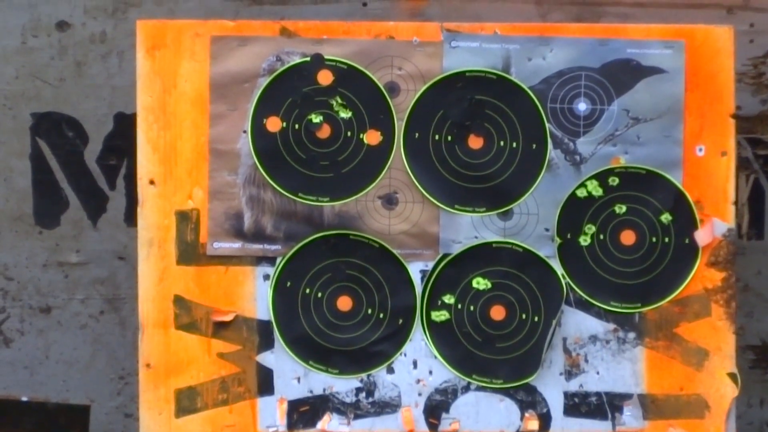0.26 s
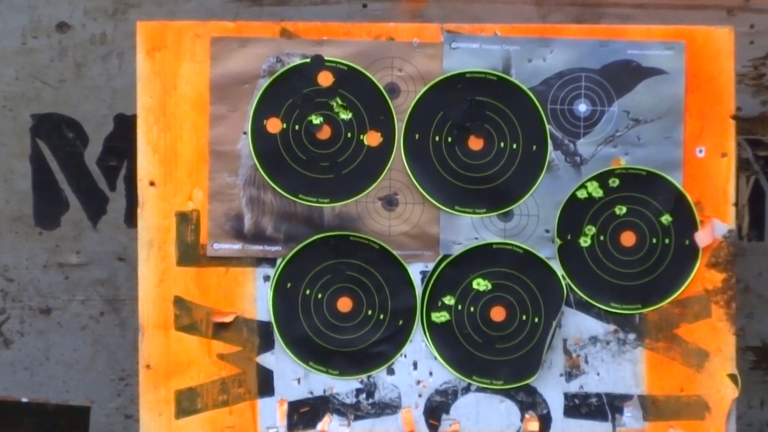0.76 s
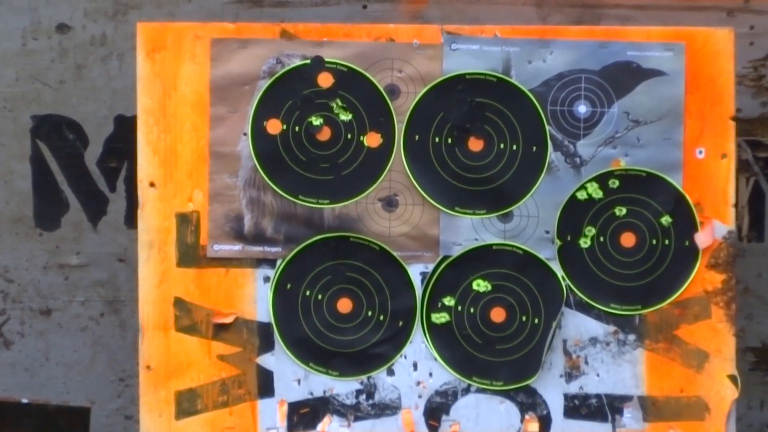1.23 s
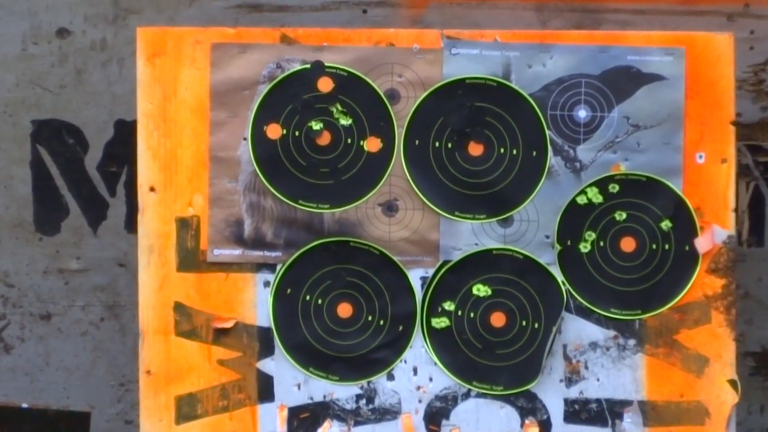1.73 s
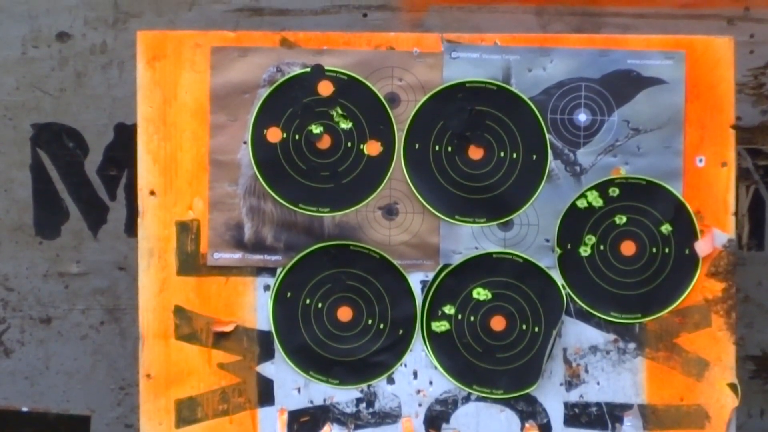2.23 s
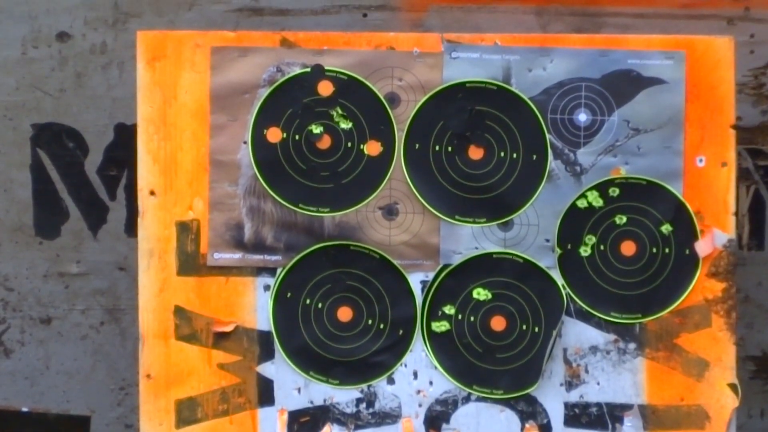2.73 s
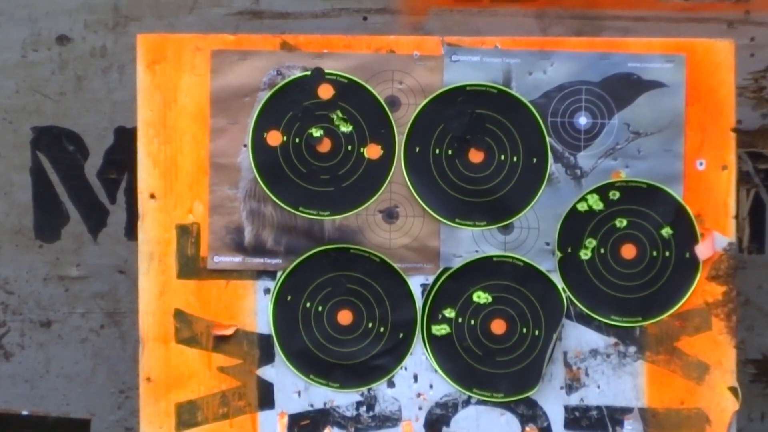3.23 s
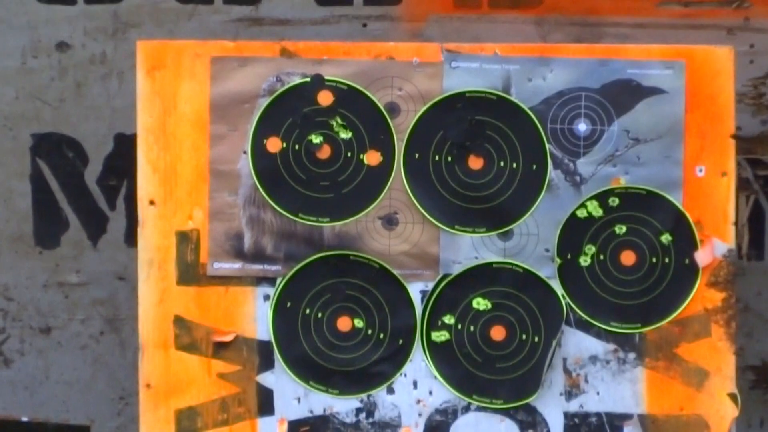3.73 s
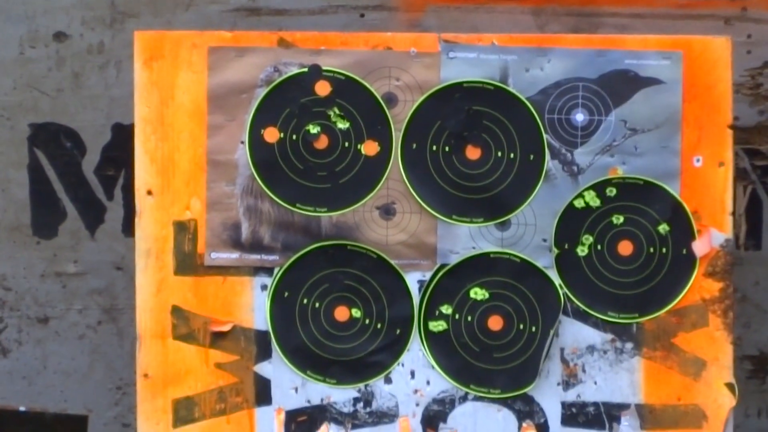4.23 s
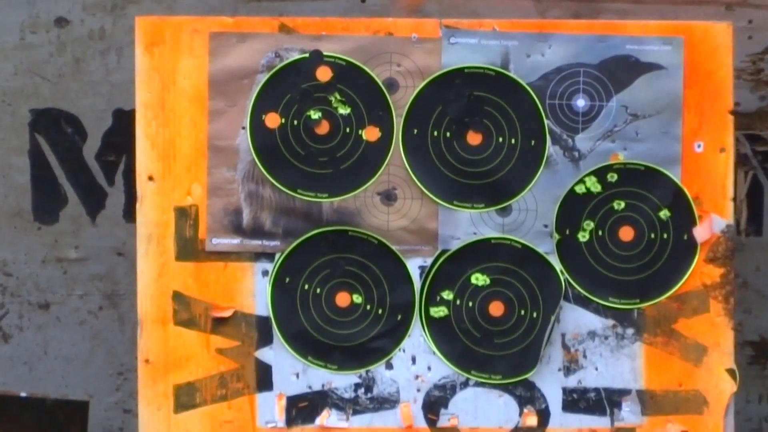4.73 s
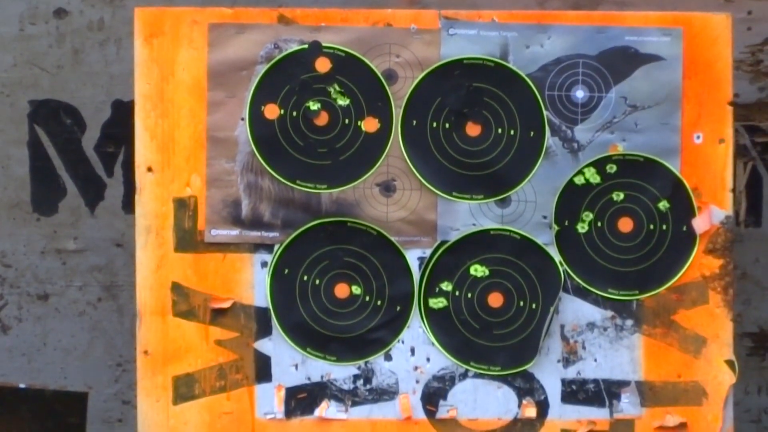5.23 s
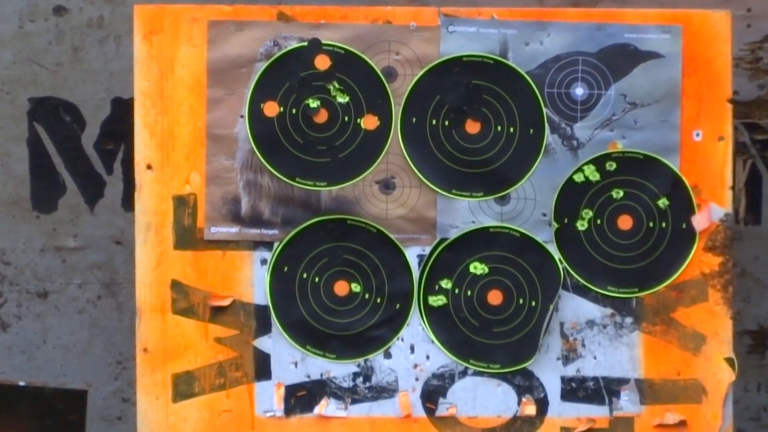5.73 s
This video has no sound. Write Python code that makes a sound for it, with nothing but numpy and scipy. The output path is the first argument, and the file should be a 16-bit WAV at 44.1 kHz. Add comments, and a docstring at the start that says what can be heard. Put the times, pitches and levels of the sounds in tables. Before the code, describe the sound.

A quiet yard outdoors, with a stereo microphone right at a shooting bench. Low, steady far traffic rumbles throughout. A small bird gives tiny, thin rising chips at about 0.6 and, fainter, 1.9 seconds. At 3.49 an air rifle fires close by: a tight cluster of woody and metallic knocks, a springy rebound and a short low jolt. Around 3.63 the pellet smacks the target with a bright, sharp crack, and the steel bin behind it booms and clangs briefly. Separate slap echoes follow until about 3.95, inside a wide ringing tail that fades over roughly a second and a half. A light airy hiss rises after the hit and stays. From 4.06 a sleeve rubs softly along the stock; from 4.48 to 4.62 the lever clacks in several quick metallic knocks, slightly left, followed by faint ticks near 4.8, 5.2 and 5.3. One last bird chip sounds at 5.74.

```python
"""In a yard, at a shooting bench right beside the microphone, an air rifle is fired. Noisy contact bursts ring the
modes of its action. A moment later the pellet smacks into a target board on a steel bin: filtered cracks, a booming
clang of modes and dying noise, and echoes round the yard. Filtered noise makes a sleeve slide along the stock, and
more ringing contacts make the lever clack. Far traffic, shaped noise, rumbles; a small bird, three rising sines,
chips; a light airy hiss comes up after the hit and stays."""
import sys
import numpy as np
from scipy import signal
from scipy.fft import rfft, irfft, next_fast_len
from scipy.io import wavfile
from scipy.ndimage import uniform_filter1d

SR = 44100
rng = np.random.default_rng(int(sys.argv[2]) if len(sys.argv) > 2 else 0)


def bounce(signal):
    """Save signal as a 16-bit WAV file at the path given by the first command-line argument."""
    frames = np.transpose(np.atleast_2d(signal))
    limited = np.clip(frames, -1, 1)
    pcm = np.round(limited * 32767).astype(np.int16)
    wavfile.write(sys.argv[1], SR, pcm)


N = 262949
TIME = np.arange(N) / SR
AGE = np.arange(2 ** 14) / SR   # time since a blow, in seconds


# Blows of the action, from sear to piston.
# Each row: start in seconds, level in dB, main pitch in Hz, treble against the ringing in dB.
FIRING_BLOWS = [(3.4902, -27.5, 1770, -6.5), (3.4942, -27, 590, -4.5), (3.5003, -22.5, 680, -11),
                (3.5085, -18, 1790, -18), (3.5150, -23.5, 1500, -15), (3.5240, -26.5, 430, -9),
                (3.5330, -19.5, 1520, -9), (3.5410, -19.5, 1080, -16)]


def firing_knocks(rebound_count):
    """The blows of the action, a run of ever weaker piston rebounds, and the spring's shiver."""
    blow_decay_s = .0034
    rebound_start_s, rebound_gap_s, rebound_decay_s = 3.549, .0103, .0052
    rebound_db, rebound_loss_db, rebound_hz, rebound_treble_db = -22, 2, 660, -15
    shiver_s, shiver_db, shiver_hz, shiver_treble_db, shiver_decay_s = 3.59, -31.5, 1790, -11, .045
    rows = [(*blow, blow_decay_s) for blow in FIRING_BLOWS]
    for k in range(rebound_count):
        start_s = rebound_start_s + k * rebound_gap_s
        level_db = rebound_db - k * rebound_loss_db
        rows.append((start_s, level_db, rebound_hz, rebound_treble_db, rebound_decay_s))
    rows.append((shiver_s, shiver_db, shiver_hz, shiver_treble_db, shiver_decay_s))
    return rows


# Modes of barrel and stock. Each row: pitch in Hz, width in Hz, level in dB.
RIFLE_MODES = [(136, 20, -1.5), (434, 24, -5), (560, 140, -17), (654, 38, -6), (689, 17, 2), (900, 90, -11),
               (1080, 83, -10), (1473, 38, 1), (1590, 38, -2), (1848, 15, -1.5), (2200, 75, -44),
               (2530, 46, -9.5), (3080, 200, -30), (3750, 91, -11), (6300, 110, -11), (7400, 200, -28),
               (8140, 300, -29)]
# The report scattered by the ground and the bench. Each row: frequency in Hz, level per Hz in dB.
REPORT_SPECTRUM = [(100, -6), (500, 2), (1000, -1.5), (1800, -4), (3000, -12), (5000, -14), (8000, -13.5),
                   (16000, -25)]
# How long the report rings. Each row: frequency in Hz, time to fall by 60 dB in seconds.
REPORT_T60 = [(200, 0.3), (2000, 0.96), (12000, 0.62)]


def rifle_shot():
    """The action's blows ring barrel and stock, and the report scatters off ground and bench."""
    out = knocks(firing_knocks(rebound_count=3), RIFLE_MODES, main_db=-2.5, main_width_hz=140,
                 soft_hz=9300, rise_share=.22, alike=.91, treble_left_db=-3.7)
    out = out * pan(-2.5)
    report = dying_noise(REPORT_SPECTRUM, REPORT_T60, alike=.93, hold_s=.025, patchy_db=1.5)
    add(out, 3.53, from_db(-29.5) * report)
    return out


def recoil(level_db):
    """The kick of the rifle jolts the microphone: a short low rumble, strongest as the piston rebounds."""
    spectrum = [(20, 2), (50, -.5), (140, 4.5), (220, -6), (400, -44), (4000, -84)]   # Hz, dB per Hz
    rumble = colour(noise(N, alike=.97), spectrum)
    kick = envelope(FIRING_BLOWS[0][0], attack=.065, hold=.02, release=.04)
    return from_db(level_db) * blow_one(rumble * kick)


# The pellet cracks through board and paper.
# Each row: start in seconds, level in dB, spread (decay of the burst) in seconds.
TARGET_CRACKS = [(3.631, -27.5, .0003), (3.6318, -27, 0.00027), (3.6348, -21.5, 0.0028)]
HIT_S = TARGET_CRACKS[0][0]


def target_cracks():
    """The board is punched through with one broad snap, and board and paper tear in bright cracks."""
    out = np.zeros((2, N))
    snap = resonate(signal.unit_impulse(len(AGE)), hz=4000, width_hz=1900)
    add(out, HIT_S, from_db(-26) * snap)
    for start_s, db, spread_s in TARGET_CRACKS:
        add(out, start_s, from_db(db) * crack(spread_s, cut_hz=14500))
    return out


# The steel sheet's dense ringing. Each row: frequency in Hz, level per Hz in dB.
CLANG_SPECTRUM = [(40, -24), (100, -12), (260, -10), (500, -1), (1100, -3), (2800, -2), (4500, -9.5),
                  (6300, -5), (9000, -16.5), (16000, -22)]
# How long the sheet rings. Each row: frequency in Hz, time to fall by 60 dB in seconds.
CLANG_T60 = [(100, 0.21), (700, 0.31), (2500, 0.38), (6000, 0.082), (14000, 0.18)]
# The bin's strongest modes. Each row: pitch in Hz, width in Hz, level in dB.
BIN_MODES = [(104.4, 6.4, -1), (173, 13, -3.5), (236, 6.7, -11), (355, 18, -4.5), (1060, 9.9, -11),
             (1500, 9, -7.5), (1686, 8.9, -9), (2640, 18, -9), (2760, 18, -9), (2980, 16, -9),
             (3330, 15, -10), (4880, 47, -14), (6040, 77, -12)]


def steel_bin():
    """The bin booms in its strongest modes, while its sheet steel clangs as dense dying noise."""
    out = np.zeros((2, N))
    clang = dying_noise(CLANG_SPECTRUM, CLANG_T60, alike=.9, hold_s=.049, patchy_db=.5)
    # Bending waves take time to spread: held back for 16 ms, then up to full level by 22 ms.
    swell = from_db(np.interp(TIME[:clang.shape[-1]], [0, .016, .022], [-3, -5, 0]))
    add(out, 3.633, from_db(-22.5) * clang * swell)
    add(out, 3.634, from_db(-17) * body(contact(.026, alike=1.0), BIN_MODES))
    return out


# Echoes of the crack from walls near and far. Each row: start in seconds, level in dB, spread in seconds.
WALL_ECHOES = [(3.6505, -29.5, .003), (3.6635, -22, .0037), (3.675, -25, .0015), (3.718, -34, .001),
               (3.78, -31.5, .021), (3.883, -43, .002), (3.95, -34.5, 0.01)]


def wall_echoes():
    """Single walls throw the crack back; longer paths lose more treble."""
    out = np.zeros((2, N))
    first_cut_hz, dulling_oct_per_s = 3700, 1.2
    for start_s, db, spread_s in WALL_ECHOES:
        cut_hz = first_cut_hz * 2 ** (-dulling_oct_per_s * (start_s - HIT_S))
        add(out, start_s, from_db(db) * crack(spread_s, cut_hz))
    return out


# The yard's dense echo. Each row: frequency in Hz, level per Hz in dB.
YARD_SPECTRUM = [(100, 1), (400, -7), (1100, -7.5), (1700, 2.5), (3000, -0.5), (5000, -6), (8000, -8),
                 (15000, -28)]
# How long the yard rings. Each row: frequency in Hz, time to fall by 60 dB in seconds.
YARD_T60 = [(100, .6), (800, 1.9), (1800, 1.87), (3500, 1.45), (7000, 0.67), (14000, 0.34)]


def yard_echo():
    """The yard answers the hit with a wide, patchy tail whose treble dies sooner than its middle."""
    out = np.zeros((2, N))
    tail = dying_noise(YARD_SPECTRUM, YARD_T60, alike=.85, hold_s=.013, patchy_db=2.0)
    add(out, 3.66, from_db(-29.5) * tail)
    return out


# The target's crack. Each row: frequency in Hz, level per Hz in dB.
CRACK_SPECTRUM = [(100, -5), (800, -8), (2000, 1), (4000, -2), (7000, -8), (12000, -9.5), (16000, -7)]


def crack(spread_s, cut_hz):
    """One crack of the target, dulled by the air on its way."""
    air = signal.butter(2, cut_hz, fs=SR, output="sos")
    burst = colour(contact(spread_s, alike=.94), CRACK_SPECTRUM)
    return blow_one(signal.sosfilt(air, burst))


# Clacks of lever and catch. Each row: start in seconds, level in dB, contact decay in seconds,
# main pitch in Hz, treble against the ringing in dB.
LEVER_CLACKS = [(4.4854, -29.5, 0.0026, 1280, -20.5), (4.5304, -23.3, .0025, 2100, -14),
                (4.5382, -36, .005, 3000, -10), (4.5578, -28, .0014, 2020, -10),
                (4.5630, -25.5, .0024, 594, -19), (4.6153, -27.5, 0.0022, 2800, -13.5),
                (4.8145, -47.5, .005, 1950, -11), (5.1995, -50.8, .0032, 1600, -1),
                (5.2760, -64, .002, 4000, -10)]


def lever_knocks():
    """Each clack is a light touch, a hard slam and a softer, longer rattle; the lever scrapes once on its way."""
    touch_lead_s, touch_loss_db = .0032, 11.5   # the parts touch just before they slam home
    settle_delay_s, settle_loss_db, settle_decay_s = .007, 14, .0086   # and rattle in the stock afterwards
    settle_hz, settle_treble_db = 550, -17
    scrape_s, scrape_db, scrape_treble_db, scrape_decay_s = 4.585, -34.5, -27, .015
    rows = [(scrape_s, scrape_db, settle_hz, scrape_treble_db, scrape_decay_s)]
    for start_s, db, decay_s, hz, treble_db in LEVER_CLACKS:
        rows.append((start_s - touch_lead_s, db - touch_loss_db, hz, treble_db, decay_s))
        rows.append((start_s, db, hz, treble_db, decay_s))
        rows.append((start_s + settle_delay_s, db - settle_loss_db, settle_hz, settle_treble_db, settle_decay_s))
    return rows


# Modes of the lever. Each row: pitch in Hz, width in Hz, level in dB.
LEVER_MODES = [(316, 58, -5), (583, 81, -2), (874, 130, 4.5), (1320, 210, 7), (1660, 130, 6),
               (2130, 130, 0.5), (2310, 55, 0), (2590, 54, -2), (2700, 49, -16), (3710, 62, -28),
               (8300, 370, -29)]


def lever():
    """Working the lever knocks its metal parts together, and they ring in broad, short modes."""
    clacks = knocks(lever_knocks(), LEVER_MODES, main_db=-.5, main_width_hz=120,
                    soft_hz=3840, rise_share=.48, alike=.87, treble_left_db=-7.0)
    return clacks * pan(-4.4)


# Bare metal contact. Each row: frequency in Hz, level per Hz in dB.
TICK_SPECTRUM = [(100, 6), (1000, 1.5), (3800, -23.5), (5200, -3.5), (7000, -0.5), (8600, -1), (12000, -10),
                 (16000, -21)]


def knocks(rows, modes, main_db, main_width_hz, soft_hz, rise_share, alike, treble_left_db):
    """Each knock rings the part that is hit and shakes the whole body, softened on top; the bare metal ticks."""
    out = np.zeros((2, N))
    soften = signal.butter(2, soft_hz, fs=SR, output="sos")
    for start_s, db, hz, treble_db, decay_s in rows:
        drive = contact(decay_s, alike, rise_share)
        struck_part = from_db(main_db) * resonate(drive, hz, main_width_hz)
        ringing = blow_one(signal.sosfilt(soften, body(drive, modes) + struck_part))
        tick = blow_one(colour(drive, TICK_SPECTRUM)) * pan(treble_left_db)
        add(out, start_s, from_db(db) * (ringing + from_db(treble_db) * tick))
    return out


# The sleeve slides to the lever, then along with it.
# Each row: start in seconds, attack in seconds, hold in seconds, release in seconds, level in dB.
SLEEVE_STROKES = [(4.06, 0.083, .33, 0.083, -43), (4.527, 0.028, 0.049, .23, -44.5)]
# Low rub of the cloth. Each row: frequency in Hz, level per Hz in dB.
RUB_SPECTRUM = [(150, -13.5), (400, 1), (880, 2.5), (1130, 0.5), (1285, 6.5), (1450, 2.5), (2200, -11),
                (3500, -16), (6000, -22.5)]
# Hiss of the cloth. Each row: frequency in Hz, level per Hz in dB.
HISS_SPECTRUM = [(1000, -21), (1800, 7.5), (3000, 4), (4500, -2), (8000, -6), (11000, -14.5), (15500, -31)]


def sleeve():
    """Cloth slides over the stock; catching fibres make its hiss a little grainy."""
    hiss_db, hiss_fade_db_per_s, grain_db = 2.8, 26, 1.6   # hiss against the rub at first
    stroke = 0
    for start_s, attack_s, hold_s, release_s, db in SLEEVE_STROKES:
        stroke = stroke + from_db(db) * envelope(start_s, attack_s, hold_s, release_s)
    since_start_s = np.maximum(TIME - SLEEVE_STROKES[0][0], 0)
    fade = from_db(hiss_db - hiss_fade_db_per_s * since_start_s)   # the arm slows
    fibres = from_db(grain_db * rms_one(uniform_filter1d(rng.standard_normal(N), size=90)))
    rub = rms_one(colour(noise(N, alike=.84), RUB_SPECTRUM)) * pan(-3.0)
    hiss = rms_one(colour(noise(N, alike=.97) * fibres, HISS_SPECTRUM)) * pan(-6.5)
    return (rub + fade * hiss) * stroke


# The bird's notes. Each row: start in seconds, length in seconds, top pitch in Hz, level in dB,
# fading over the note in dB.
BIRD_CHIPS = [(0.608, 0.037, 8800, -52, 8), (1.902, .03, 8000, -59.5, 1), (5.737, .031, 9000, -52, -3.5)]


def bird(scatter_db, t60):
    """Thin notes flick up to a shelf, then climb ever faster to the top, smeared by scattering among trees."""
    shelf_hz, flick_hz, flick_s, climb_power = 7320, 1710, .00403, 2.67
    out = np.zeros((2, N))
    for start_s, length_s, top_hz, db, fade_db in BIRD_CHIPS:
        along = np.linspace(0, 1, round(length_s * SR))
        flick = flick_hz * np.exp(-along * length_s / flick_s)
        climb = (top_hz - shelf_hz) * along ** climb_power
        hz = shelf_hz - flick + climb
        swell = signal.windows.tukey(len(along), .35) * from_db(db - fade_db * along)
        add(out, start_s, np.sqrt(2) * swell * np.sin(2 * np.pi * np.cumsum(hz) / SR))
    trees = noise(len(AGE), alike=.4) * from_db(-60 * AGE / t60)
    trees /= np.linalg.norm(trees[0])
    return out + from_db(scatter_db) * signal.fftconvolve(out, trees, axes=-1)[:, :N]


# Distant traffic. Each row: frequency in Hz, level per Hz in dB.
TRAFFIC_SPECTRUM = [(25, -14), (42, 0), (95, 0), (160, -7), (260, -14), (450, -14), (720, -21.5),
                    (950, -29), (1280, -25.5), (1660, -36), (1870, -29.5), (3100, -41), (3500, -36),
                    (5000, -43), (16000, -47.5)]
# Stereo likeness of the traffic. Each row: frequency in Hz, left-right correlation from 0 to 1.
TRAFFIC_LIKENESS = [(60, 0.99), (130, 0.99), (290, 0.84), (640, 0.49), (1410, 0.18), (3100, 0.27),
                    (6820, .75), (15000, 1)]


def traffic(level_db):
    """Far traffic is steady shaped noise, alike in both ears in the bass and diffuse in the middle."""
    mid, side = rfft(rng.standard_normal((2, 2 * next_fast_len(N // 2 + 1))))
    alike = at_hz(TRAFFIC_LIKENESS, np.linspace(0, SR / 2, len(mid)))
    wide = irfft(np.sqrt(1 + alike) * mid + np.sqrt(1 - alike) * np.array([side, -side]))[:, :N]
    return from_db(level_db) * rms_one(colour(wide, TRAFFIC_SPECTRUM))


# The light airy hiss. Each row: frequency in Hz, level per Hz in dB.
AIR_SPECTRUM = [(150, -9), (330, -6), (480, 1), (950, -13), (1150, -12), (1280, -6), (1450, -14),
                (3000, -27), (6000, -32), (9000, -30), (16000, -33)]


def airy_hiss(level_db, rise_s):
    """The ambience brightens from the hit on: shaped noise rises in a straight line and stays."""
    risen = np.clip((TIME - HIT_S) / rise_s, 0, 1)
    return from_db(level_db) * risen * rms_one(colour(noise(N, alike=.85), AIR_SPECTRUM))


def contact(decay_s, alike, rise_share=.3):
    """A burst of micro-impacts that builds up quickly and dies away; long contacts also start softly."""
    u = np.minimum(AGE / decay_s, 40)
    return noise(len(AGE), alike) * np.exp(-u) * (1 - np.exp(-u / rise_share))


def resonate(x, hz, width_hz):
    """One resonance, a two-pole filter at unit blow energy."""
    r = np.exp(-np.pi * width_hz / SR)
    poles = [1, -2 * r * np.cos(2 * np.pi * hz / SR), r * r]
    return blow_one(signal.lfilter([1, 0, -1], poles, x + 1e-18))


def body(x, modes):
    """All the modes of an object, driven by one contact."""
    return blow_one(sum(from_db(db) * resonate(x, hz, width_hz) for hz, width_hz, db in modes))


def dying_noise(spectrum, t60s, alike, hold_s, patchy_db):
    """Dense ringing: half-octave bands hold, then die, each at its own rate and unevenly; rms 1 before decay."""
    age = np.arange(3 * 2 ** 15) / SR
    hz = np.fft.rfftfreq(len(age), 1 / SR)
    source = rfft(rms_one(colour(noise(len(age), alike), spectrum)))
    centres = np.geomspace(60, 16000, 17)
    knots = np.arange(0, age[-1], .015)   # one random level step every 15 ms
    out = 0
    for centre, pick in zip(centres, np.eye(len(centres))):
        band = irfft(source * np.interp(hz, centres, pick))
        fall_db = 60 * np.maximum(age - hold_s, 0) / at_hz(t60s, centre)
        patches_db = patchy_db * np.interp(age, knots, rng.standard_normal(len(knots)))
        out = out + band * from_db(patches_db - fall_db)
    return out


def noise(size, alike):
    """Stereo white noise with a given left-right correlation."""
    mid, side = rng.standard_normal((2, size))
    return np.sqrt((1 + alike) / 2) * mid + np.sqrt((1 - alike) / 2) * np.array([side, -side])


def colour(x, spectrum):
    """Causal (minimum-phase) filter with the given spectrum, built by folding its cepstrum."""
    size = 2 * next_fast_len(x.shape[-1] // 2 + 1)
    gain = from_db(at_hz(spectrum, np.fft.rfftfreq(size, 1 / SR)))
    cepstrum = irfft(np.log(gain))
    cepstrum[1:size // 2] *= 2
    cepstrum[size // 2 + 1:] = 0
    return irfft(rfft(x, size) * np.exp(rfft(cepstrum)))[..., :x.shape[-1]]


def envelope(start, attack, hold, release):
    """Straight rise, hold and fall, all in seconds, as a gain per sample."""
    return np.interp(TIME, start + np.cumsum([0, attack, hold, release]), [0, 1, 1, 0])


def at_hz(points, hz):
    """Read a table along a log-frequency axis."""
    known_hz, values = np.transpose(points)
    return np.interp(np.log(np.maximum(hz, 1)), np.log(known_hz), values)


def from_db(db):
    """Decibels to amplitude gain."""
    return 10 ** (np.asarray(db) / 20)


def rms_one(x):
    """Scale a sound to rms 1."""
    return x / np.sqrt(np.mean(x ** 2) + 1e-20)


def blow_one(x):
    """Scale a blow to the energy of 10 ms at rms 1."""
    energy = np.mean(np.sum(x ** 2, axis=-1))
    return x * np.sqrt(.01 * SR / (energy + 1e-20))


def pan(left_db):
    """Stereo gains that make the left louder than the right by left_db."""
    return from_db(np.array([[left_db], [-left_db]]) / 2)


def add(out, start_s, sound):
    """Mix a sound in at its start time."""
    start = round(start_s * SR)
    out[:, start:start + sound.shape[-1]] += sound[..., :N - start]


def scene():
    """Everything heard at the shooting bench."""
    rifle = rifle_shot() + recoil(level_db=-19) + lever()
    pellet = target_cracks() + steel_bin() + wall_echoes() + yard_echo()
    background = traffic(level_db=-44.7) + airy_hiss(level_db=-54.5, rise_s=1.0)
    return rifle + pellet + sleeve() + bird(scatter_db=-.5, t60=.46) + background


def record(dry):
    """The highest peaks are rounded and the top of the treble is cut."""
    top, cutoff_hz = .8, 15750
    rounded = top * np.tanh(dry / top)
    treble_cut = signal.ellip(12, .1, 80, cutoff_hz, fs=SR, output="sos")
    return signal.sosfilt(treble_cut, rounded)


dry = scene()
out = record(dry)
bounce(out)
```